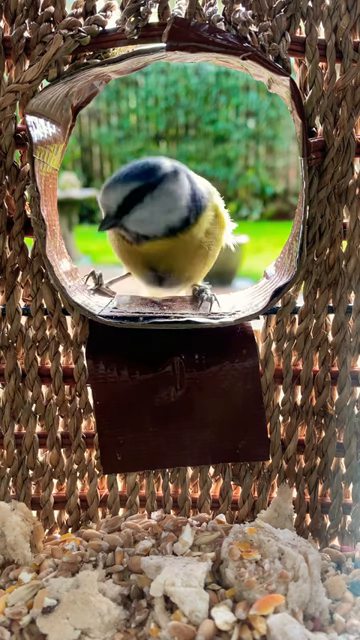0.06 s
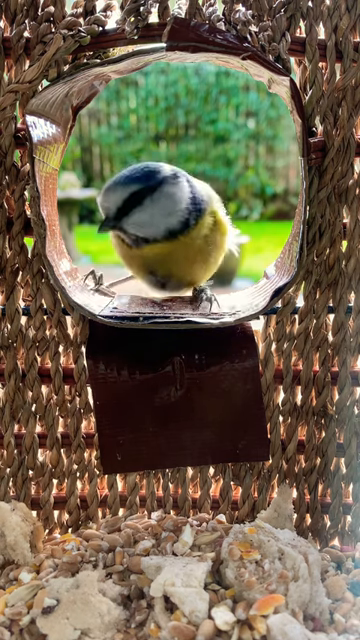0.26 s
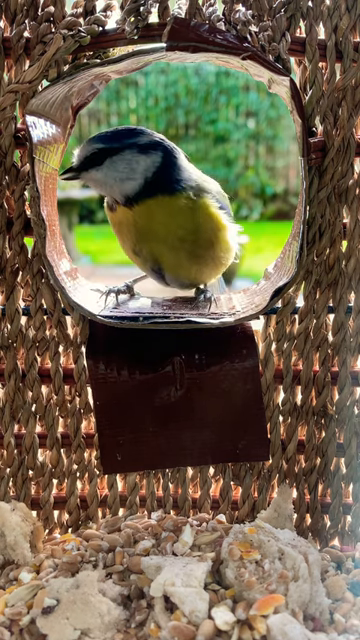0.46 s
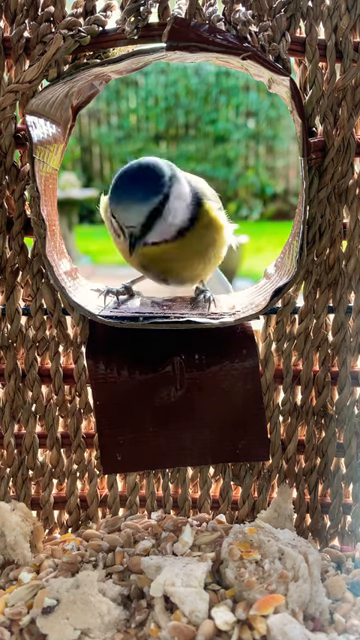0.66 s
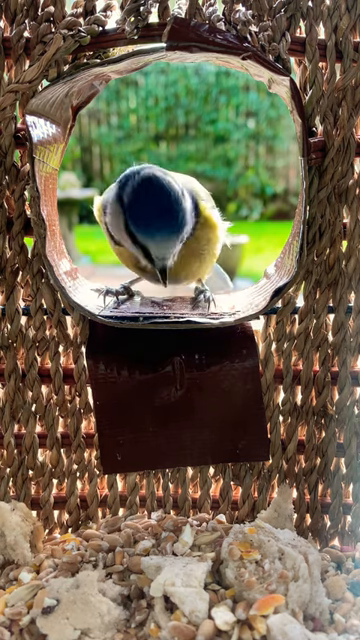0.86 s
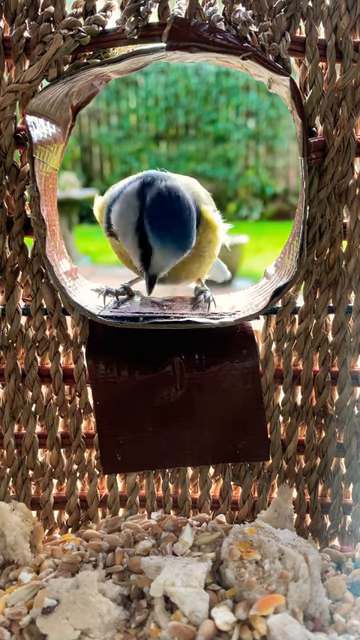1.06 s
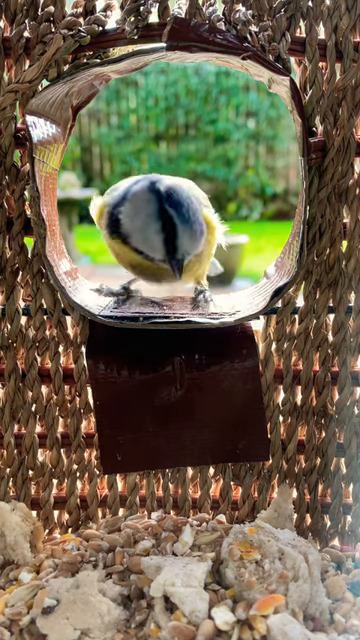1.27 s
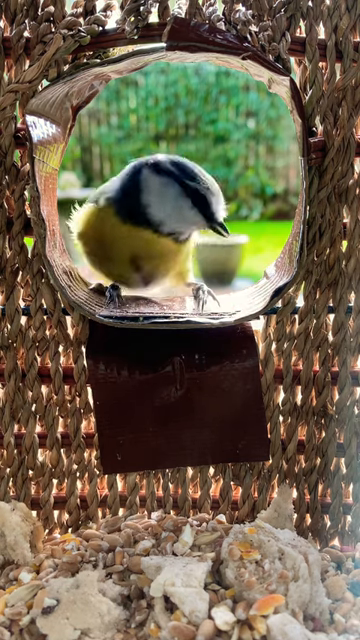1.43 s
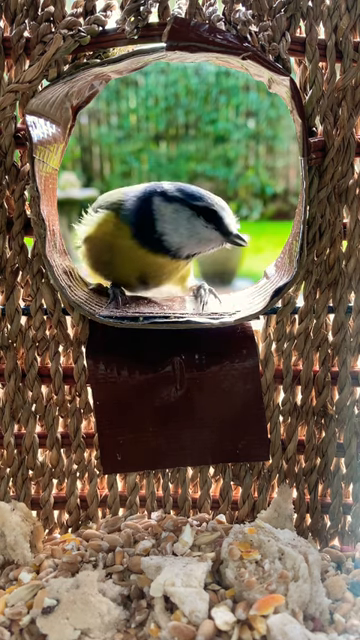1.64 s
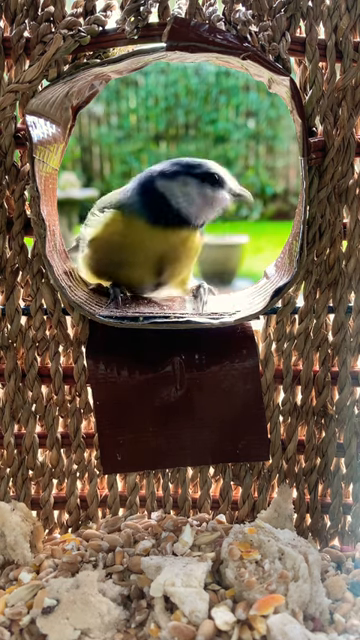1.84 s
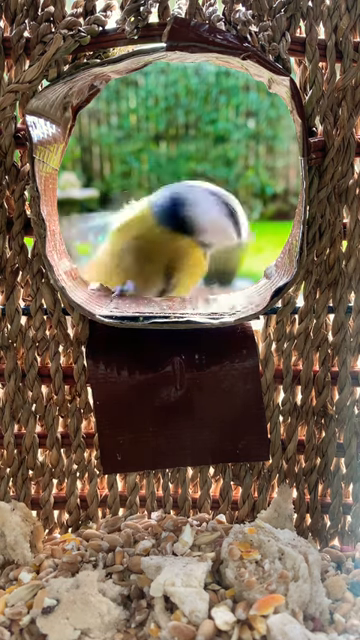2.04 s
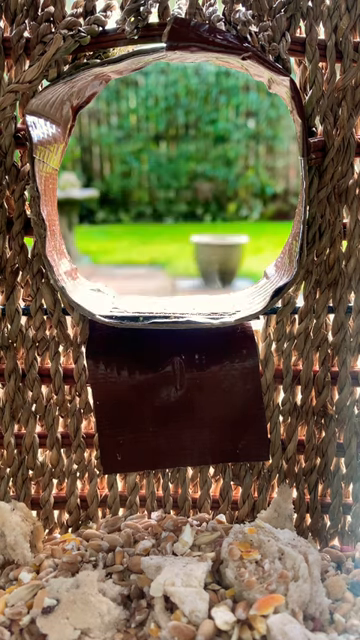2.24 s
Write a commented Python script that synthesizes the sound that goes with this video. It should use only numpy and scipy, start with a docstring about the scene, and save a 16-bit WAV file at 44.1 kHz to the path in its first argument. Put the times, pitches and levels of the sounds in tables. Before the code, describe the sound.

A small bird sings one phrase: thin overlapping whistles, then ticks alternating with short buzzes, then a quick twitter. Heard from a nest box, slightly to the left, with a light garden echo over a low outdoor rumble.

```python
"""Songbird heard from a nest box.

A small bird sings one phrase in a garden: thin overlapping whistles, ticks alternating with
two-voiced buzzes, then a twitter. Each side of its voice box makes a nearly pure tone; in the
buzzes the two flutter and beat. The garden echoes the song over a low outdoor rumble."""
import sys
import numpy as np
from scipy import signal
from scipy.fft import rfft, irfft
from scipy.io import wavfile
from scipy.ndimage import uniform_filter1d

SR = 44100
rng = np.random.default_rng(int(sys.argv[2]) if len(sys.argv) > 2 else 0)


def put_to_file(sound):
    """Save the sound as 16-bit audio at rate SR, in the file named by the first command-line argument."""
    columns = np.atleast_2d(sound).T  # one column per channel
    safe = np.clip(columns, -1, 1)
    whole_steps = np.round(safe * 32767)
    wavfile.write(sys.argv[1], SR, whole_steps.astype(np.int16))


N = 101429


def amp(db):
    """Decibels to gain."""
    return 10 ** (np.asarray(db) / 20)


def unit(x):
    """Scales to rms 1."""
    return x / np.sqrt(np.mean(x ** 2) + 1e-20)


def at_hz(points, hz):
    """Reads a table on a log-frequency axis."""
    f, value = np.transpose(points)
    return np.interp(np.log(hz + 1), np.log(f + 1), value)


def add(mix, start_s, sound):
    """Mixes a sound in at start_s."""
    part = mix[round(start_s * SR):][:len(sound)]
    part += sound[:len(part)]


def drift(rate_hz):
    """Low-passed noise of rms 1."""
    hz = np.fft.rfftfreq(N, 1 / SR)
    return unit(irfft(rfft(rng.standard_normal(N)) / (1 + (hz / rate_hz) ** 4), N))


def noise_pair(correlation):
    """Partly alike left and right noise: Hz, seconds, short-time spectra."""
    hz, t, (left, other) = signal.stft(rng.standard_normal((2, N)), SR, nperseg=1024, noverlap=768)
    same = np.clip(at_hz(correlation, hz), -1, 1)[:, None]
    right = same * left + np.sqrt(1 - same ** 2) * other
    return hz[:, None], t, np.array([left, right])


def waveform(spectra):
    """Short-time spectra to sound."""
    return signal.istft(spectra, nperseg=1024, noverlap=768)[1][:, :N]


# Each row: frequency in Hz, relative noise density in dB.
AIR_SPECTRUM = [(26, -20), (42, -4), (65, 3), (110, -2), (200, -5.5), (350, -10.5), (500, -16.5),
                (750, -24.5), (1200, -17.5), (1800, -17.5), (3500, -32), (5000, -34.5), (7000, -35),
                (10000, -39.5), (15500, -39)]
# Each row: frequency in Hz, left-right correlation.
AIR_CORRELATION = [(30, 0.25), (80, 0.84), (160, 0.3), (400, .2), (1200, 0.12), (4000, 0.64), (12000, 0.89)]
# Each row: frequency in Hz, left minus right in dB.
AIR_BALANCE = [(50, -1.7), (300, 0), (1500, 1), (10000, -1)]


def outdoor_air(level_db=-51.5, patch_db=0.5):
    """Low rumble and faint hiss in drifting patches."""
    hz, _, spectra = noise_pair(AIR_CORRELATION)
    patches = uniform_filter1d(rng.standard_normal(spectra.shape[1:]), size=10, axis=0)
    patches = unit(uniform_filter1d(patches, size=16, axis=1))
    lean_db = at_hz(AIR_BALANCE, hz) / 2
    shape_db = at_hz(AIR_SPECTRUM, hz) + patch_db * patches + np.array([lean_db, -lean_db])
    return amp(level_db) * unit(waveform(spectra * amp(shape_db)))


# Each row: frequency in Hz, relative noise density in dB.
WASH_SPECTRUM = [(1800, -40), (2700, -0.5), (3700, 12.5), (4600, 0.5), (5600, -2), (6600, -27)]


def treble_wash(start_db=-58, fade_db_per_s=18.5):
    """Soft noise dies away, like the last echo of earlier song."""
    hz, _, spectra = noise_pair(AIR_CORRELATION)
    noise = unit(waveform(spectra * amp(at_hz(WASH_SPECTRUM, hz))))
    return noise * amp(start_db - fade_db_per_s * np.arange(N) / SR)


# Each row: frequency in Hz, seconds to fall 60 dB.
ECHO_T60_S = [(1500, 2.5), (2500, 0.85), (4000, 0.73), (8500, 0.6)]
# Each row: frequency in Hz, gain in dB.
ECHO_DB = [(1500, -9), (2500, -7.5), (4000, -11), (6000, -3), (8500, -15)]
SCATTER_DB = [(1800, -4), (4000, -8), (8500, -9.5)]
# Each row: delay in seconds, left gain in dB, right gain in dB.
REFLECTIONS = [(.0062, -37, -30), (0.014, -39, -13.5), (0.028, -24, -29.5)]


def garden_echo(song, scatter_t60_s=0.11, correlation=0.78, rise_s=0.003):
    """Near reflections, quick scatter and a longer echo."""
    hz, t, spectra = noise_pair([(1000, correlation), (9000, correlation)])

    def decay(db, t60_s):
        """Exponential envelope whose total energy is set by db."""
        return amp(db - 60 * t / t60_s) * np.sqrt(2 * np.log(1000) / (t60_s * SR))

    echo = decay(at_hz(ECHO_DB, hz), at_hz(ECHO_T60_S, hz))
    scatter = decay(at_hz(SCATTER_DB, hz), scatter_t60_s)
    onset = np.minimum(np.arange(N) / SR / rise_s, 1) ** 2
    response = waveform(spectra * np.hypot(echo, scatter)) * onset * amp([[1.2], [-1.2]])
    for delay_s, left_db, right_db in REFLECTIONS:
        response[:, round(delay_s * SR)] += amp([left_db, right_db])
    return signal.fftconvolve(song[None], response, axes=1)[:, :N]


# Each row: frequency in Hz, left minus right in dB.
DIRECT_BALANCE = [(1800, 9.5), (2700, 9), (3700, 6.5), (4500, 5), (7500, 4.5), (8400, 3), (8800, 3)]
# Each row: frequency in Hz, left phase lead in radians.
DIRECT_PHASE = [(2600, -0.25), (3700, -0.6), (5400, -0.27)]


def direct_path(song, gain_db=-2.5):
    """The song arrives straight from the bird, louder on the left."""
    hz = np.fft.rfftfreq(N, 1 / SR)
    lean = amp(at_hz(DIRECT_BALANCE, hz) / 2) * np.exp(0.5j * at_hz(DIRECT_PHASE, hz))
    return amp(gain_db) * irfft(rfft(song) * np.array([lean, 1 / lean]), N)


# Each row: frequency in Hz, relative noise density in dB.
RASP_SPECTRUM = [(2500, -19), (4000, 5.5), (5200, -5.5), (6200, -13), (8000, -12), (9800, -21),
                 (13000, -17), (15500, -25)]
WHISTLE_HISS_SPECTRUM = [(4000, -18.5), (7000, -15), (8300, -0.5), (9800, -20.5), (12000, -11.5),
                         (15500, -23)]


def with_rasp(voice, rasp_db, spectrum=RASP_SPECTRUM):
    """Adds airy noise that follows the loudness of the voice."""
    colour = amp(at_hz(spectrum, np.fft.rfftfreq(N, 1 / SR)))
    hiss = unit(irfft(rfft(rng.standard_normal(N)) * colour, N))
    loudness = np.sqrt(abs(uniform_filter1d(voice ** 2, size=40)))
    return voice + amp(rasp_db) * hiss * loudness


RISE_S, OVERTONE_DB = 0.0013, -45


def tone(hz, db, rise_s=RISE_S, release_s=0.0014, overtone_db=OVERTONE_DB):
    """One side of the voice box: a nearly pure tone with soft edges."""
    t = np.arange(len(hz)) / SR
    phase = 2 * np.pi * np.cumsum(hz) / SR
    ramp = np.clip(np.minimum(t / rise_s, (t[-1] - t) / release_s), 0, 1)
    overtone = amp(overtone_db) * np.sin(2 * phase) * (2 * hz < SR / 2)
    return np.sqrt(2) * amp(db) * np.sin(np.pi / 2 * ramp) * (np.sin(phase) + overtone)


def whistle(curve, waver=0.0039, side_tones=(), overtone_db=OVERTONE_DB, waver_db=1.64, edge_s=0.004):
    """A long note that wavers slightly in pitch and level."""
    times_s, hz, db = np.transpose(curve)
    t = np.arange(times_s[0], times_s[-1], 1 / SR)
    pitch_hz = np.interp(t, times_s, hz) * (1 + waver * drift(225)[:len(t)])
    level_db = np.interp(t, times_s, db) + waver_db * drift(46)[:len(t)]
    out = np.zeros(N)
    for offset_hz, side_db in [(0, 0), *side_tones]:
        add(out, times_s[0], tone(pitch_hz + offset_hz, level_db + side_db, edge_s, edge_s, overtone_db))
    return out


# One whistle per table. Each row: time in seconds, pitch in Hz, relative level in dB.
OPENING = [(0.14, 1597, -61), (0.182, 1818, -55.5), (0.232, 1852, -46), (0.274, 1824, -51.5),
           (0.328, 1721, -42.5), (.345, 1705, -48), (0.36, 1680, -64)]
LOW_DROP = [(0.359, 2583, -55), (.38, 2372, -53), (0.401, 1945, -48.5), (0.429, 1794, -43)]
LOW_HOLD = [(.44, 1770, -64), (.56, 1770, -75), (.68, 1796, -55.5), (.78, 1802, -58.5)]
MIDDLE = [(0.57, 3170, -57), (0.598, 3157, -40.5), (0.621, 3107, -39.5)]
LOW_SLIDE = [(0.576, 2860, -54), (0.621, 2626, -46), (0.659, 2580, -43.5), (0.712, 2722, -37),
             (.732, 2672, -39), (0.756, 2350, -39.5), (0.782, 2127, -40.5), (0.807, 2023, -41.5),
             (.85, 2010, -39), (.93, 2031, -50.5), (0.961, 2017, -54)]
FAINT_HOLD = [(.68, 5390, -62), (.76, 5380, -64), (.9, 5310, -67)]


def low_whistles():
    """Overlapping slides and holds in the lower voice."""
    return sum(whistle(curve) for curve in (OPENING, LOW_DROP, LOW_HOLD, MIDDLE, LOW_SLIDE, FAINT_HOLD))


# One whistle per table. Each row: time in seconds, pitch in Hz, relative level in dB.
PEEP = [(.125, 8400, -79), (.15, 8550, -75), (.18, 8600, -75)]
FAINT_FALL = [(.28, 8400, -76), (.34, 7560, -68.5), (0.386, 6860, -62.5)]
HIGH_DIP = [(.565, 7260, -66), (0.596, 6600, -59), (0.642, 6520, -60), (0.691, 6970, -62)]
UNDERTONE = [(.565, 7560, -47), (.584, 7720, -49.5), (.60, 7760, -52.5), (.655, 7660, -45.5),
             (.72, 7700, -50), (.765, 7410, -57)]
HIGH_FALL = [(0.381, 8950, -69), (.41, 8790, -57.5), (0.451, 8600, -48.5), (.49, 8210, -46),
             (0.532, 7715, -51.5), (0.561, 7550, -51)]
HIGH_ARCH = [(1.831, 6620, -60), (1.842, 7540, -48), (1.853, 8330, -44.5), (1.881, 8400, -44.5),
             (1.906, 7800, -41.5), (1.927, 7370, -43), (1.946, 7250, -42), (1.957, 6160, -54)]
HIGH_HELD = [(.58, 8460, -52.5), (.615, 8850, -37), (.66, 8856, -34), (.695, 8674, -36), (.73, 8630, -33.5),
             (.765, 8600, -37), (.8, 8366, -30), (.84, 8374, -36), (.89, 8350, -30.5), (.952, 8320, -35)]
# Gaps in the held whistle. Each row: centre in seconds, half width in seconds.
BREAKS = [(.704, 0.005), (0.743, 0.0067), (0.817, 0.014), (0.864, 0.01), (0.913, 0.0087)]
# Faint tones beside a whistle. Each row: offset in Hz, level against the whistle in dB.
SIDE_TONES = [(-3900, -22.5), (3931, -23)]


def high_whistles(waver=0.011, held_db=-1):
    """Thin glides and a held note that breaks into pulses; the louder ones carry hiss."""
    t = np.arange(N) / SR
    faint = sum(whistle(curve, waver) for curve in (PEEP, FAINT_FALL, HIGH_DIP))
    undertone = whistle(UNDERTONE, overtone_db=-11.5)
    glides = whistle(HIGH_FALL, waver, SIDE_TONES) + whistle(HIGH_ARCH, side_tones=SIDE_TONES)
    gate = np.prod([1 - np.exp(-((t - centre_s) / half_s) ** 4) for centre_s, half_s in BREAKS], axis=0)
    held = amp(held_db) * gate * whistle(HIGH_HELD, waver=0.002, side_tones=SIDE_TONES)
    return faint + undertone + with_rasp(glides + held, rasp_db=-21, spectrum=WHISTLE_HISS_SPECTRUM)


# Each row: start in seconds, lower voice's length in seconds, pitch in Hz, relative level in dB,
# then upper voice's delay in seconds, length in seconds, pitch in Hz, relative level in dB.
BUZZES = [(1.037, .03, 3960, -32.5, 0.0021, 0.0362, 4320, -31.5),
          (1.248, .013, 3774, -30.5, 0.0024, 0.028, 4393, -36.5),
          (1.354, 0.0094, 3776, -28.5, 0.0041, 0.019, 4350, -32),
          (1.4635, 0.01, 3923, -27.5, .004, 0.0213, 4440, -34),
          (1.581, 0.0075, 3895, -30, 0.0024, 0.0205, 4372, -34.5)]


def buzzes(flutter_hz=450, swing_hz=117, jitter=0.027, climb=0.021, arch=0.045, edge_s=0.0026):
    """Two fluttering voices beat: the lower snaps on and stops early, the upper arches over it."""
    out = np.zeros(N)

    def flutter(hz):
        """Adds a fast regular swing and random jitter to a pitch curve."""
        swing = swing_hz * np.sin(2 * np.pi * flutter_hz * np.arange(len(hz)) / SR)
        return hz * (1 + jitter * drift(325)[:len(hz)]) + swing

    for start_s, lower_s, lower_hz, lower_db, delay_s, upper_s, upper_hz, upper_db in BUZZES:
        rising = 1 + climb * np.linspace(-0.5, 0.5, round(lower_s * SR))
        arching = 1 + arch * (np.sin(np.linspace(0, np.pi, round(upper_s * SR))) - 2 / np.pi)
        add(out, start_s, tone(flutter(lower_hz * rising), lower_db, RISE_S, edge_s))
        add(out, start_s + delay_s, tone(flutter(upper_hz * arching), upper_db, edge_s, edge_s))
    return out


# Each row: start in seconds, length in seconds, pitch in Hz, relative level in dB,
# pitch fall as a fraction, level change in dB.
TICKS = [(1.099, 0.011, 3755, -26, 0.069, -7), (1.1452, 0.014, 3639, -28, -0.045, 3.5),
         (1.197, 0.0095, 3650, -30, -0.013, 8.5), (1.3006, 0.014, 3574, -25.5, 0.069, -18),
         (1.409, 0.011, 3600, -26, 0.1, -16), (1.523, 0.011, 3620, -29, 0.08, -8)]


def ticks():
    """Very short tones, most falling and fading."""
    out = np.zeros(N)
    for start_s, length_s, hz, db, fall, change_db in TICKS:
        progress = np.arange(0, length_s, 1 / SR) / length_s
        add(out, start_s, tone(hz * (1 + fall * (0.5 - progress)), db + change_db * progress ** 2))
    return out


# Each row: start in seconds, length in seconds, first, middle and last pitch in Hz,
# relative level in dB, warble depth in Hz, warble rate in Hz.
CHIPS = [ (1.0149, 0.017, 4473, 4345, 4310, -29.5, -4, -5),
         (1.074, 0.068, 3950, 3155, 2360, -42, 459, 69.5), (1.137, 0.022, 2380, 2243, 2100, -48, 304, 88),
         (1.165, 0.082, 2387, 2400, 2330, -53, 286, 78), (1.28, .030, 2775, 2260, 2030, -47.5, 235, 87),
         (1.329, 0.014, 2230, 2780, 2280, -48, -6, 7), (1.367, 0.039, 2190, 2150, 2230, -52, 113, 66.5),
         (1.439, 0.028, 2450, 2416, 2110, -54.5, -23, -13), (1.469, 0.046, 2286, 2405, 2540, -53.5, 8, -12),
         (1.615, 0.052, 2437, 2240, 2325, -57, -2, -7), (1.688, 0.0055, 3850, 3770, 3420, -34.5, 3, -6),
         (1.698, .015, 2660, 2140, 2330, -46.5, -6, -6), (1.734, 0.0043, 2950, 2460, 2200, -41.5, 0, 15),
         (1.761, 0.015, 3754, 3800, 3450, -27.5, 186, 160),
         (1.776, 0.034, 4160, 4470, 4190, -43.5, 208, 142), (1.778, 0.013, 6330, 5100, 5300, -51, 0, 2),
         (1.804, 0.015, 3025, 2876, 2660, -36, 15, 37), (1.838, 0.0093, 4150, 4920, 4370, -33.5, 0, -2),
         (1.842, .011, 4350, 3850, 3870, -26.5, -13, 5), (1.899, 0.011, 2970, 4210, 6000, -41.5, 0, 0),
         (1.905, 0.011, 4000, 3660, 3680, -29.5, -250, 152),
         (1.912, 0.0142, 3270, 2832, 2970, -32.5, 0, -2), (1.949, 0.0066, 2890, 2710, 2550, -35.5, 3, -2),
         (1.983, 0.012, 3904, 4010, 3750, -29.5, -280, 151), (2.045, 0.0073, 4430, 4820, 4360, -35, 0, 0),
         (2.05, 0.0112, 3950, 3800, 3120, -39.5, -300, 169),
         (2.0934, 0.0094, 2770, 2680, 3160, -41.5, 0, -2), (2.121, 0.0078, 3370, 4030, 4750, -46, -4, -2),
         (2.204, 0.015, 4560, 3940, 3060, -47.5, 365, 74)]


def twitter(fade_db=-3):
    """Quick gliding chips, some warbled."""
    out = np.zeros(N)
    for start_s, length_s, first_hz, middle_hz, last_hz, db, depth_hz, rate_hz in CHIPS:
        t = np.arange(0, length_s, 1 / SR)
        glide_hz = np.interp(t / t[-1], [0, 0.5, 1], [first_hz, middle_hz, last_hz])
        warble_hz = depth_hz * np.sin(2 * np.pi * rate_hz * t)
        add(out, start_s, tone(glide_hz + warble_hz, db + fade_db * t / length_s))
    return out


def scene(whistle_db=-2.5, chatter_db=-0.5):
    """The song and its garden echo over the background."""
    whistles = low_whistles() + high_whistles()
    chatter = with_rasp(buzzes(), rasp_db=-19.5) + with_rasp(ticks() + twitter(), rasp_db=-25)
    song = amp(whistle_db) * whistles + amp(chatter_db) * chatter
    return direct_path(song) + garden_echo(song) + outdoor_air() + treble_wash()


def record(dry):
    """Low-pass at 15.9 kHz."""
    lowpass = signal.firwin(511, 15900, window=("kaiser", 9), fs=SR)
    return signal.oaconvolve(dry, lowpass[None], "same")


dry = scene()
out = record(dry)
put_to_file(out)
```